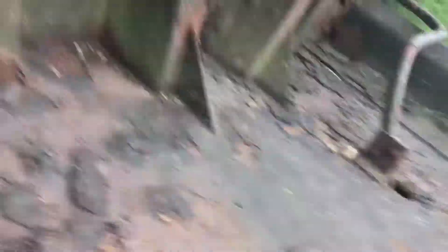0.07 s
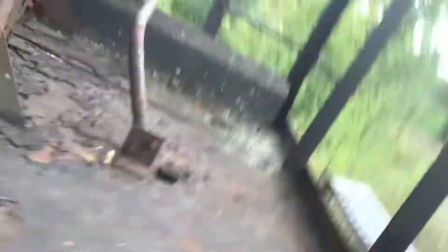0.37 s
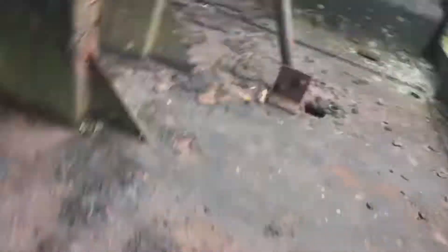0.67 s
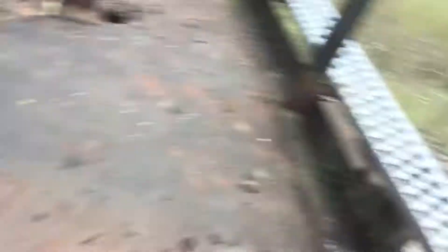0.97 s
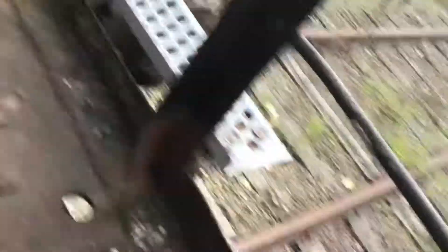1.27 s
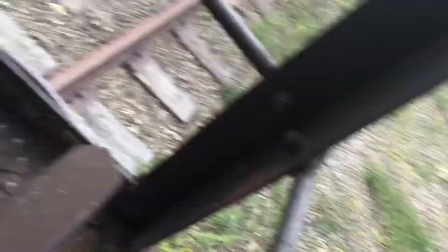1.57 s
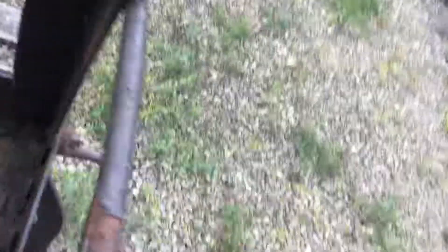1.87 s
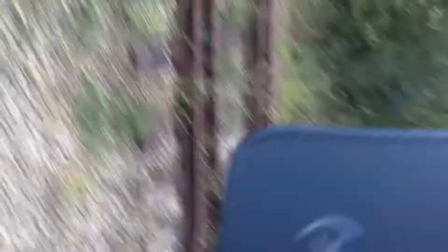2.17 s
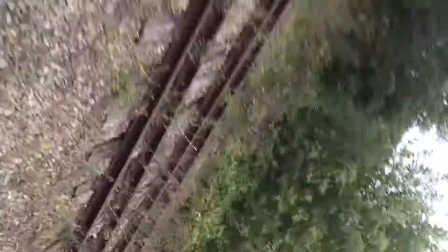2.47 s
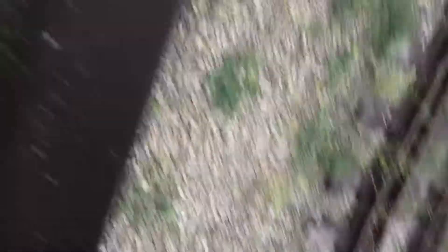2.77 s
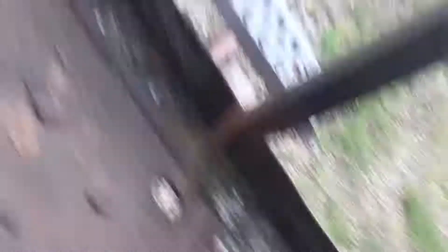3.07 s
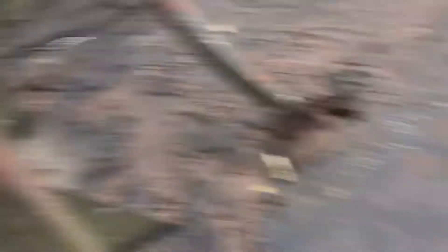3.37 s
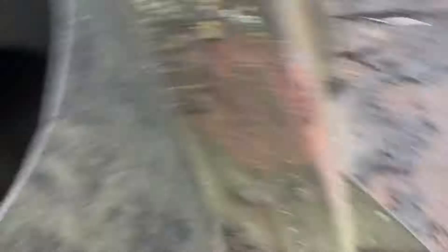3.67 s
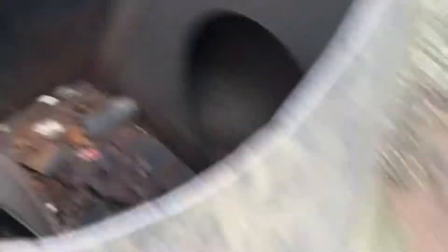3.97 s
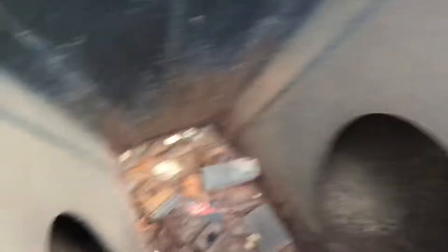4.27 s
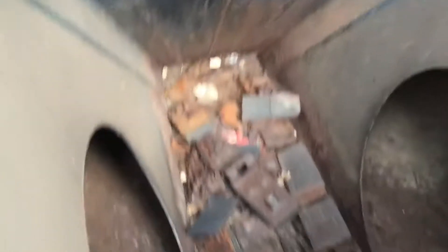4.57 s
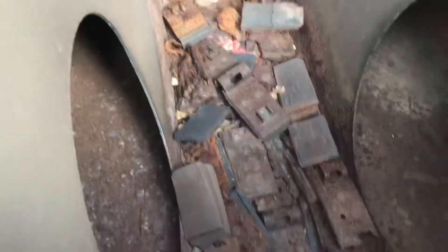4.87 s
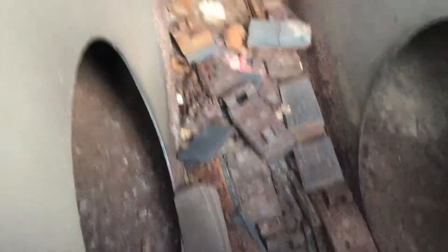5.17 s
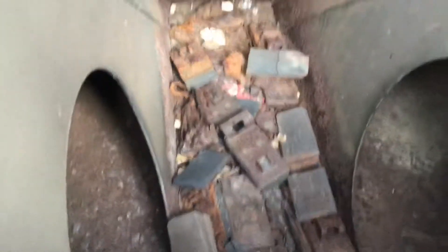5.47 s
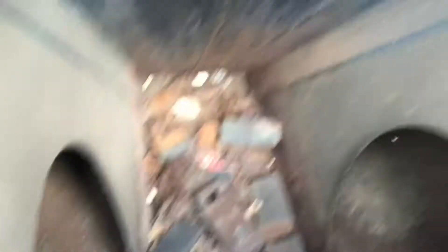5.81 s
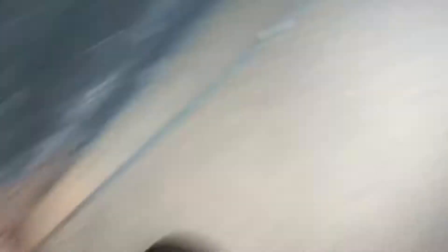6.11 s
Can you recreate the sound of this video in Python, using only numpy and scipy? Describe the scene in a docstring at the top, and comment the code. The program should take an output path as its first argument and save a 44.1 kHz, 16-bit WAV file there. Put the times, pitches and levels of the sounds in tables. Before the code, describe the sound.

Close, dull footsteps thump on steel plate while a handheld microphone catches rumbles of moving air. Two groups of sharp knocks stand out, the loudest slightly overloading, the second with a sole scraping on rust. Lighter steps, a metallic clack, snapping grit and rubbing clothes follow. Toward the end only tiny ticks and soft scuffs remain over the faint hum of a hollow railcar in still outdoor air.

```python
"""Steps on a derelict railcar

Someone carrying a camera steps about on the steel deck, then leans into the hollow body. Close knocks
and steps thump through the plate, the loudest overloading the microphone. Grit clicks, a sole skids on
rust, loose steel clacks, clothing rustles and each swing of the camera pushes air over the microphone
port. The steel compartments hum faintly over a quiet outdoor hush."""
import sys
import numpy as np
from scipy import signal
from scipy.fft import rfft, irfft
from scipy.io import wavfile
from scipy.ndimage import uniform_filter1d

SR = 44100
rng = np.random.default_rng(int(sys.argv[2]) if len(sys.argv) > 2 else 0)


def digitize_waveform(pressure):
    """Quantize a signal to 16-bit integers and store it at the path in sys.argv[1].

    Rows of a 2-D input are taken as channels; values are limited to [-1, 1].
    """
    field = np.atleast_2d(pressure).T
    bounded = np.clip(field, -1, 1)
    quanta = np.round(bounded * 32767).astype(np.int16)
    wavfile.write(sys.argv[1], SR, quanta)


N = 279726
TIME = np.arange(N) / SR

# Open air, far off. Each row: frequency in Hz, gain in dB.
HUSH_COLOUR = [(18, -57), (30, -27.5), (55, -8), (86, -10.5), (124, -2.5), (161, -14), (227, -16),
               (300, -20.5), (616, -27), (1000, -31.5), (2500, -31.5), (4500, -33), (7300, -45),
               (14800, -68)]
# Air modes of the steel compartments. Each row: centre in Hz, width in Hz.
AIR_MODES = [(107, 32), (143, 13), (186, 18), (325, 78)]
# Each entry: steady level of the matching air mode in dB.
AIR_MODE_DB = [-64.5, -55.5, -62.5, -71]
# The microphone passes a spot where a mode is strong.
# Each row: peak time in seconds, spread in seconds, mode in Hz, added level in dB.
MODE_SWELLS = [(0.0, 0.23, 143, -46), (1.13, .17, 143, -45), (1.88, 0.26, 325, -50.5),
               (2.302, .25, 186, -47), (3.4, .25, 325, -55), (3.75, .55, 186, -47), (4.42, 0.47, 143, -42),
               (4.7, 0.66, 107, -44), (5.9, 0.532, 107, -52)]
# A hollow ring hanging after the first loud knock. Each row: time in seconds, level in dB.
HOLLOW_RING = [(1.445, -66), (1.47, -47), (1.57, -50), (1.85, -62), (2.0, -67), (2.1, -80)]
# Clothing and soles rubbing, close by. Each row: start in seconds, length in seconds, level in dB.
RUBS = [(0.77, 0.096, -65), (1.67, .105, -56), (2.015, 0.024, -50.5), (2.376, 0.061, -42),
        (2.44, 0.16, -45), (2.645, 0.027, -43.5), (2.74, 0.063, -51), (2.82, 0.073, -64),
        (2.955, 0.079, -49.5), (3.07, 0.078, -58), (3.18, 0.094, -55), (3.31, 0.062, -57),
        (3.5, .05, -55.5), (3.555, 0.081, -51), (3.645, 0.039, -46.5), (3.73, 0.057, -50),
        (4.02, 0.033, -42), (4.06, 0.093, -53), (4.23, 0.086, -53.5), (4.55, 0.14, -68), (5.52, 0.087, -62),
        (5.89, 0.033, -53.5), (5.94, 0.14, -62.5)]
# The bright grain of that rubbing. Each row: frequency in Hz, gain in dB.
RUB_COLOUR = [(400, 3), (900, -3), (2200, 3), (3300, 0), (4800, 1), (6500, -7), (9000, -10.5),
              (12000, -8.5), (15500, -11)]
# Air over the port as the camera swings.
# Each row: start in seconds, length in seconds, relative levels of rumble and of flutter in dB.
GUSTS = [(0.06, 0.053, -29.5, -30.5), (0.14, 0.069, -37, -33.5), (0.208, 0.052, -20.5, -33),
         (0.27, 0.056, -25.5, -31), (0.34, .14, -26, -41.5), (0.5, 0.11, -29, -42), (0.64, 0.2, -35.5, -51),
         (1.62, 0.15, -21.5, -34.5), (2.03, 0.3, -34, -41.5), (2.385, 0.19, -30, -42.5),
         (2.76, 0.053, -24, -38), (2.885, .2, -30.5, -37.5), (3.1, 0.17, -31, -36.5),
         (3.45, .065, -33.5, -40), (3.72, .11, -38.5, -45), (5.84, 0.35, -46.5, -57)]
# Eddies right at the port. Each row: frequency in Hz, gain in dB.
RUMBLE_COLOUR = [(25, -33.5), (55, 6), (90, 11), (150, 5.5), (230, -3.5), (350, -23), (700, -66)]
# Soft bumps of the hand on the camera. Each row: frequency in Hz, gain in dB.
FLUTTER_COLOUR = [(120, -22), (250, 5), (340, -2), (470, -10), (700, -15.5), (950, -28.5), (1400, -45),
                  (3000, -69)]
# Close knocks and steps, before the deck colours them. Each row: start in seconds, thump level in dB,
# thump pitch in Hz, crack level in dB, crack pitch in Hz, crack decay in seconds.
KNOCKS = [(0.085, -22.5, 187, -61, 500, .004), (0.242, -18, 152, -58, 403, .005),
          (0.4, -20.5, 121.6, -66, 400, .004), (0.793, -24.5, 94.5, -51, 920, .003),
          (1.238, -33.5, 173, -47, 500, .001), (1.4462, 2.5, 167, -6.5, 620, .0026),
          (1.5882, -11.5, 194, -18.5, 1260, .0025), (1.612, -4.5, 160, -23.5, 1340, 0.0036),
          (1.681, -22, 134, -29, 1600, 0.0029), (1.695, -16, 141, -27, 2150, 0.0018),
          (1.715, -22, 131, -29.5, 2000, .002), (1.722, -10, 154.5, -20.5, 1290, .002),
          (1.734, -18, 149, -29, 1800, 0.0025), (1.753, -19, 170, -24.5, 1120, 0.0026),
          (1.767, -14.5, 177, -27.5, 1320, 0.0052), (2.034, -17, 185, -40, 1100, 0.0036),
          (2.107, -27.5, 159, -55, 700, .005), (2.432, -13.5, 195, -23.5, 600, 0.0028),
          (2.437, -8, 99, -36, 600, .002), (2.536, 4, 175, -13, 617, .005),
          (2.624, -12.5, 135, -22, 620, 0.002), (2.6483, 1, 201, -12, 690, 0.0052),
          (2.652, -1, 104.7, -12, 3900, 0.001), (2.772, -14, 199, -54, 500, .004),
          (2.914, -23, 190, -45, 605, 0.0022), (3.107, -23, 208, -49, 600, .003),
          (3.132, -21.5, 180, -45, 505, 0.0026), (3.237, -20.5, 203, -34, 600, 0.0075),
          (3.247, -10.5, 119, -47, 500, .006), (3.51, -25, 173, -43, 596, .003),
          (3.841, -34.5, 220, -40.5, 1520, 0.0015), (3.893, -23, 210, -29, 477, 0.0026),
          (4.2151, -37, 233, -34, 580, 0.00086), (4.334, -47, 230, -38, 520, .0008),
          (5.0097, -27, 160, -31, 430, 0.00089), (5.753, -41, 199, -50.5, 520, .005),
          (6.087, -46, 220, -46, 520, 0.0037), (6.234, -51, 200, -43.5, 560, 0.0024)]
# The tone the steel deck gives to knocks and clicks. Each row: frequency in Hz, gain in dB.
DECK_COLOUR = [(60, 1.5), (200, 0.5), (350, -2.5), (470, 1.5), (590, 5.5), (740, 4.5), (880, -0.5),
               (1100, -1.5), (1500, 1), (2500, 0), (5000, 0), (7500, -3.5), (15000, -3.5)]
# Ring of the car body. Each row: frequency in Hz, time to fall 60 dB in seconds.
BODY_T60 = [(100, 0.47), (500, 0.41), (2500, 0.18), (6000, 0.07), (14000, .06)]
# The tone of that ring. Each row: frequency in Hz, gain in dB.
BODY_COLOUR = [(100, -1), (330, -1.5), (600, 4), (900, 0.5), (2500, -0.5), (6000, -5), (14000, -12)]
# Grit and bits of metal snapping, before the deck colours them.
# Each row: start in seconds, level in dB, pitch in Hz, width in octaves, decay in seconds.
CLICKS = [(0.125, -40, 720, 0.86, .0013), (0.69, -52, 600, 0.92, .0023), (1.587, -27, 10000, 1.6, .0015),
          (1.609, -35, 4500, 2.8, .002), (1.7219, -26, 3500, 2.5, .001), (2.036, -41, 4000, 1.8, .0012),
          (2.3687, -35.5, 1590, 1.4, 0.002), (2.3978, -28.5, 2500, 1.8, 0.0017),
          (2.405, -28, 3800, 1.3, .0006), (2.537, -28, 4200, 1.1, .0008),
          (2.6245, -29, 4500, 0.99, 0.00071), (2.803, -40, 4980, 0.86, 0.00069),
          (2.966, -38, 3000, 1.9, 0.0053), (2.9971, -31, 2300, 2.2, 0.0032),
          (3.005, -26.5, 1800, 3, 0.00056), (3.2158, -24, 1900, 3.9, 0.00052),
          (3.229, -33, 4970, 1.3, 0.0011), (3.4649, -25.5, 1400, 4.2, .0006),
          (3.677, -39, 3020, 1.2, 0.0041), (3.8933, -15.5, 1850, 2.4, .0011), (3.894, -31, 8100, .15, .002),
          (3.9741, -28, 1110, 1.8, 0.0019), (4.0347, -36, 4800, 1.7, 0.0095),
          (4.106, -42, 5130, 0.93, 0.0032), (4.2155, -43, 1990, 1.8, 0.0011),
          (4.2824, -30.5, 5000, 3.2, 0.0025), (4.7302, -48, 5500, 1.9, 0.0031),
          (4.8757, -47, 6500, 2.2, .0011), (5.1864, -54.5, 6500, 2.2, 0.0022),
          (5.3582, -48, 8000, 2.5, .0013), (5.906, -50.5, 1790, 1.07, .013),
          (5.96, -53.5, 1400, 0.94, .007), (6.045, -55, 1500, 0.97, 0.015)]
# Soft scuffs on the deck. Each row: start in seconds, length in seconds, level in dB.
SCUFFS = [(0.125, .03, -50.5), (0.18, .14, -61), (1.67, .11, -44), (2.012, 0.022, -49), (2.095, 0.03, -53),
          (2.2, 0.043, -56), (2.37, .05, -49.5), (2.76, .025, -52), (3.1, 0.17, -51.5), (3.55, 0.18, -58),
          (3.74, 0.043, -45.5), (5.9, 0.055, -54.5), (6.03, 0.078, -59), (6.15, .04, -60)]
# A sole brushing steel. Each row: frequency in Hz, gain in dB.
SCUFF_COLOUR = [(200, -11), (550, 6), (1000, -3), (1500, 1.5), (2300, -12.5), (5000, -23), (12000, -30.5)]
# One short, close skid. Each row: time in seconds, level in dB.
SKID_LEVEL = [(2.549, -41), (2.552, -18), (2.560, -17), (2.573, -13.5), (2.579, -9.5), (2.587, -12.5),
              (2.591, -35)]
# A sole scraping rust. Each row: frequency in Hz, gain in dB.
SKID_COLOUR = [(150, -5.5), (560, 3), (850, -6.5), (1100, -13), (1900, -16.5), (2250, -4), (2700, -19),
               (3600, -25), (4600, -25), (7000, -42.5), (15000, -42)]
# Resonances of a loose piece of steel. Each row: frequency in Hz, gain in dB.
CLACK_COLOUR = [(350, -30), (600, -20), (964, -9.5), (1310, -5.5), (1860, -13.5), (2180, -3), (2460, -16),
                (3120, -10.5), (4160, -21), (4750, -26), (6270, -19.5), (8600, -40), (14000, -46)]
# Response of the camera's microphone. Each row: frequency in Hz, gain in dB.
MIC_RESPONSE = [(15, -13), (35, -3.5), (70, 0.5), (200, 0.5), (500, 0), (1000, -0.5), (2300, -1),
                (3200, -1), (4000, -2), (5300, -1.5), (7000, -2.5), (9000, 0), (12000, -6), (15000, -4)]


def amp(db):
    """Decibels to gain."""
    return 10 ** (np.asarray(db) / 20)


def unit(x):
    """Scales to rms 1."""
    return x / np.sqrt(np.mean(x ** 2) + 1e-20)


def read(points, hz):
    """Reads a curve on a log-frequency axis."""
    f, value = np.transpose(points)
    return np.interp(np.log(hz + 1), np.log(f + 1), value)


def level(rows):
    """Gain over time from a dB curve; silent outside it."""
    return amp(np.interp(TIME, *np.transpose(rows), left=-120, right=-120))


def add(mix, s, sound):
    """Mixes a sound in at s seconds."""
    part = mix[max(round(s * SR), 0):][:len(sound)]
    part += sound[:len(part)]


def colour(x, points, size=4096):
    """Minimum-phase filter with the given spectrum."""
    log_gain = np.log(amp(read(points, abs(np.fft.fftfreq(size, 1 / SR)))))
    taps = np.fft.ifft(np.exp(np.conj(signal.hilbert(log_gain)))).real
    return signal.oaconvolve(x, taps)[:len(x)]


def band(x, lo_hz, hi_hz, order=1):
    """Gentle band-pass."""
    sos = signal.butter(order, [lo_hz, min(hi_hz, SR / 2.2)], "band", fs=SR, output="sos")
    return signal.sosfilt(sos, x)


def band_noise(lo_hz, hi_hz, order=2, size=N):
    """Noise between two frequencies, rms 1."""
    return unit(band(rng.standard_normal(size), lo_hz, hi_hz, order))


def resonant_noise(centre_hz, width_hz):
    """Noise held in one steep-sided resonance, rms 1."""
    detuning = (np.fft.rfftfreq(N, 1 / SR) - centre_hz) / (width_hz / 2)
    return unit(irfft(rfft(rng.standard_normal(N)) / (1 + detuning ** 2), N))


def grains(per_s, spread_db=0):
    """Random clicks; spread_db makes their sizes more unequal."""
    size_db = spread_db * np.minimum(rng.exponential(1, N), 4)
    hits = rng.random(N) < per_s / SR
    return unit(hits * rng.standard_normal(N) * amp(size_db))


def speckle(x, patch_db):
    """Each crushed flake has its own pitch: short, narrow patches stand out of the noise."""
    spectrum = signal.stft(x, SR, nperseg=512)[2]
    patches = uniform_filter1d(rng.standard_normal(spectrum.shape), 6, axis=0)
    patches = unit(uniform_filter1d(patches, 5, axis=1))
    return unit(signal.istft(spectrum * amp(patch_db * patches), SR, nperseg=512)[1][:N])


def strokes(rows, attack_s, sag_db_per_s, release_s, column=2):
    """Gain over time of a set of strokes: each rises, sags while it lasts, then dies away."""
    out = np.zeros(N)
    for row in rows:
        start, length = row[:2]
        t = np.arange(0, length + 10 * release_s, 1 / SR)
        attack = np.minimum(t / attack_s, 1)
        release = np.exp(-np.maximum(t - length, 0) / release_s)
        add(out, start, attack * amp(row[column] - sag_db_per_s * t) * release)
    return out


def burst(decay_s, first=2.5, chatter=0.64, size=4096):
    """One sharp contact followed by a quickly dying chatter."""
    force = chatter * rng.standard_normal(size) * np.exp(-np.arange(size) / SR / decay_s)
    force[0] = first
    return force


def struck(x, db, decay_s):
    """Sets a short sound's level, counting its energy over one decay time plus 1 ms."""
    return amp(db) * x / np.sqrt(np.sum(x ** 2) / (SR * (decay_s + .001)))


def snap(db, hz, octaves, decay_s, skirt=4.6):
    """A dry click with one broad resonance."""
    breadth = 2 ** (octaves / 2)
    click = band(burst(decay_s, first=2.6), hz / breadth, hz * breadth)
    return struck(band(click, hz / skirt, hz * skirt), db, decay_s)


def hush(mid_band_db=-62.5):
    """Steady outdoor noise in the distance."""
    air = colour(rng.standard_normal(N), HUSH_COLOUR)
    return amp(mid_band_db) * air / np.std(band(air, 500, 8000, order=4))


def hum(steadiness=0.17):
    """Outdoor air excites the compartments' low modes; each swells as the microphone moves about."""
    gains = [amp(db) * np.ones(N) for db in AIR_MODE_DB]
    for s, spread, hz, db in MODE_SWELLS:
        nearest = np.argmin([abs(centre - hz) for centre, _ in AIR_MODES])
        gains[nearest] += amp(db) * np.exp(-((TIME - s) / spread) ** 2)
    out = np.zeros(N)
    for (centre, width), gain in zip(AIR_MODES, gains):
        mode = signal.hilbert(resonant_noise(centre, width))
        evened = mode.real / abs(mode) ** steadiness  # softens the random fading
        out += unit(evened) * gain
    return out


def rubbing(clump_db=1.5, rustle_db=-71):
    """Cloth and soles rub in fine grains near the microphone; the clothing is never quite still."""
    clumps = amp(clump_db * band_noise(25, 140))
    fibres = grains(per_s=1400, spread_db=0.5) + .5 * rng.standard_normal(N)
    gain = strokes(RUBS, attack_s=0.008, sag_db_per_s=8, release_s=0.017) + amp(rustle_db)
    return speckle(colour(clumps * fibres, RUB_COLOUR), patch_db=3.5) * gain


def buffet(lump_db=1.5, rumble_trim_db=-1.5, flutter_trim_db=-3.5):
    """Lumpy eddies at the microphone port and soft bumps of the hand as the camera swings."""
    shape = dict(attack_s=0.02, sag_db_per_s=7.2, release_s=0.019)
    lumps = amp(lump_db * band_noise(9.7, 35))
    bumps = grains(per_s=900)
    rumble = unit(colour(rng.standard_normal(N), RUMBLE_COLOUR)) * strokes(GUSTS, **shape, column=2)
    flutter = unit(colour(bumps, FLUTTER_COLOUR)) * strokes(GUSTS, **shape, column=3)
    return lumps * (amp(rumble_trim_db) * rumble + amp(flutter_trim_db) * flutter)


def thump(hz, rise_cycles=0.9, glide=0.5717, size=8192):
    """A blow spreads through steel plate, treble first, bass last; echoes from the edges roughen it."""
    t = np.arange(size) / SR
    pitch = hz * (0.0098 / (t + .0011)) ** glide  # falls through hz about 9 ms after the blow
    wobble = band_noise(.4 * hz, 1.6 * hz, order=3, size=size)
    scatter = band_noise(.7 * hz, 2.6 * hz, order=3, size=size)
    phase = 2 * np.pi * np.cumsum(pitch * np.exp(.16 * wobble)) / SR
    age = t * hz / rise_cycles  # peaks at 1, so low thumps last longer
    envelope = (age * np.exp(1 - age)) ** 1.32
    return envelope * (np.sin(phase) + .18 * scatter)


def knocks(hard_db=-15.5, dulling_db_per_octave=14, tick_db=-29, tick_growth=1.45, breadth=1.4, skirt=6):
    """Each close knock is a thump, a contact crack and a bright tick; softer contacts are duller."""
    out = np.zeros(N)
    for s, thump_db, thump_hz, crack_db, crack_hz, decay_s in KNOCKS:
        add(out, s, amp(thump_db) * thump(thump_hz))
        hardness_db = crack_db - hard_db
        top_hz = crack_hz * (1 + skirt * 2 ** (hardness_db / dulling_db_per_octave) / 2)
        crack = band(burst(decay_s), crack_hz / breadth, crack_hz * breadth)
        crack = band(crack, crack_hz / skirt, top_hz, order=2)
        add(out, s, struck(crack, crack_db, decay_s))
        add(out, s, snap(tick_db + tick_growth * hardness_db, hz=7300, octaves=1.6, decay_s=.001))
    return out


def body_ring(contacts, gain_db=-31):
    """The car body rings on faintly behind each contact, the treble dying first."""
    hz, t, spectrum = signal.stft(rng.standard_normal(SR // 2), SR, nperseg=256)
    decay = amp(-60 * t / read(BODY_T60, hz)[:, None])
    tail = signal.istft(spectrum * decay, SR, nperseg=256)[1]
    ring = signal.oaconvolve(contacts, tail / np.linalg.norm(tail))[:N]
    return amp(gain_db) * colour(ring, BODY_COLOUR)


def clicks():
    """Grit and small bits of metal snap on the deck."""
    out = np.zeros(N)
    for s, db, hz, octaves, decay_s in CLICKS:
        add(out, s, snap(db, hz, octaves, decay_s))
    return out


def scuffs():
    """Soles brush the deck in soft, grainy strokes."""
    scuff = colour(grains(per_s=1800, spread_db=2), SCUFF_COLOUR)
    return speckle(scuff, patch_db=4) * strokes(SCUFFS, attack_s=0.01, sag_db_per_s=8.1, release_s=0.012)


def hollow_ring():
    """One broad resonance hangs in the air after the first loud knock."""
    return resonant_noise(centre_hz=690, width_hz=300) * level(HOLLOW_RING)


def skid():
    """A sole skids on rust in a rush of coarse slips."""
    return unit(colour(grains(per_s=3000), SKID_COLOUR)) * level(SKID_LEVEL)


def clack(start_s=3.0685, db=-19.5, decay_s=0.0077):
    """A loose piece of steel takes one sharp hit and chatters briefly."""
    out = np.zeros(N)
    steel = colour(burst(decay_s, first=9.1), CLACK_COLOUR)
    add(out, start_s, struck(steel, db, decay_s))
    return out


def fine_grit(start_s=4.35, end_s=5.62, count=16):
    """Finer grit shifts under the soles in faint, random ticks while the walker leans in."""
    out = np.zeros(N)
    for when, strength, pitch in rng.random((count, 3)):
        tick = snap(db=-58 + 6 * strength, hz=4800 * 2 ** (pitch - .5), octaves=1.6, decay_s=.0014)
        add(out, start_s + when * (end_s - start_s), tick)
    return out


def scene():
    """From on the deck, in mono: close contacts and a little body ring, over buffeting, hum and hush."""
    impacts = colour(knocks() + clicks() + clack() + fine_grit(), DECK_COLOUR)
    contacts = impacts + skid() + scuffs() + rubbing()
    return (contacts + body_ring(contacts) + buffet() + hollow_ring() + hum() + hush())[None]


def record(dry, ceiling=1.02, top_hz=16200):
    """The camera's microphone colours the sound, rounds off the loudest knocks and cuts the far treble."""
    heard = colour(dry[0], MIC_RESPONSE)
    rounded = heard / (1 + (heard / ceiling) ** 4) ** (1 / 4)
    low_pass = signal.firwin(511, top_hz, window=("kaiser", 9), fs=SR)
    return signal.oaconvolve(rounded, low_pass, "same")[None]


dry = scene()
out = record(dry)
digitize_waveform(out)
```